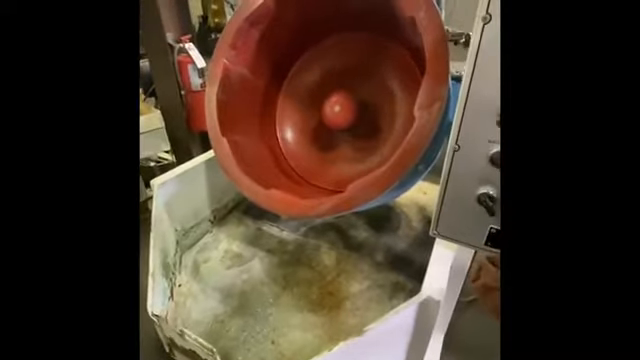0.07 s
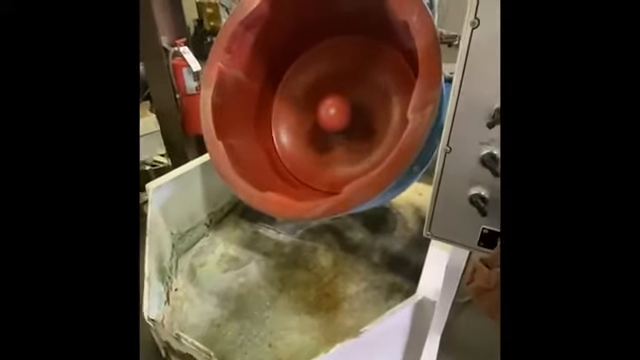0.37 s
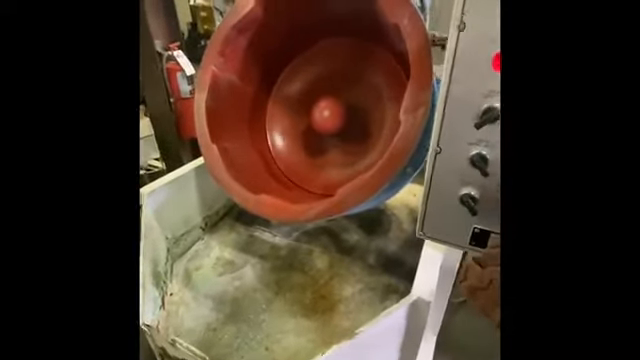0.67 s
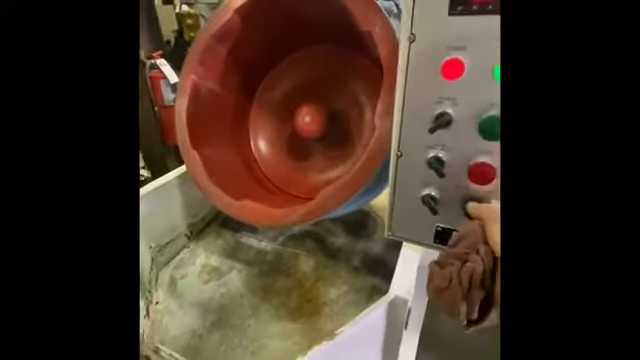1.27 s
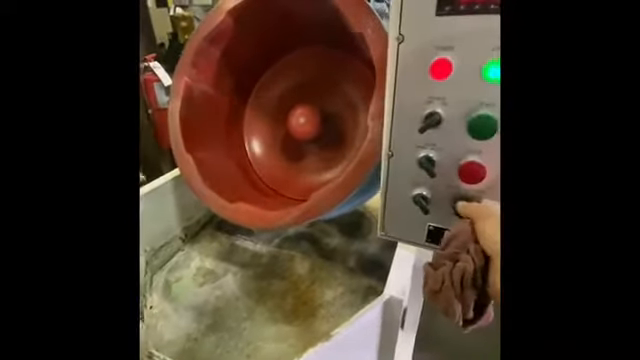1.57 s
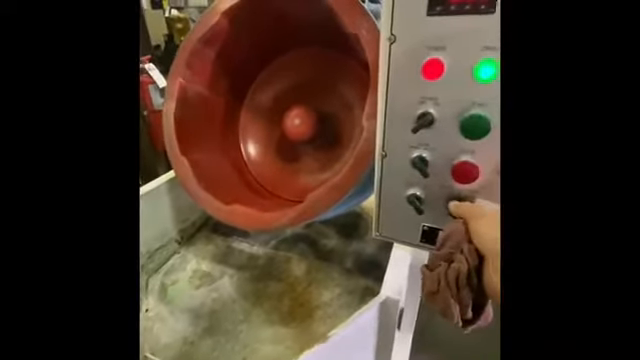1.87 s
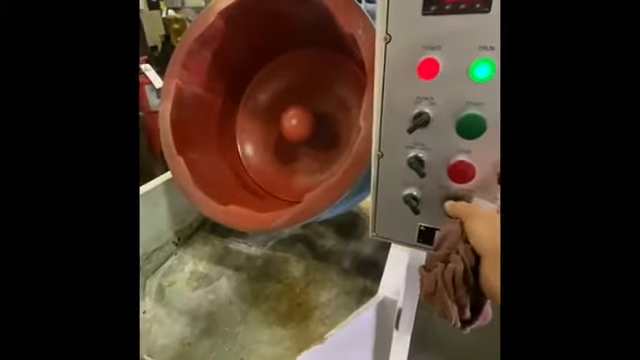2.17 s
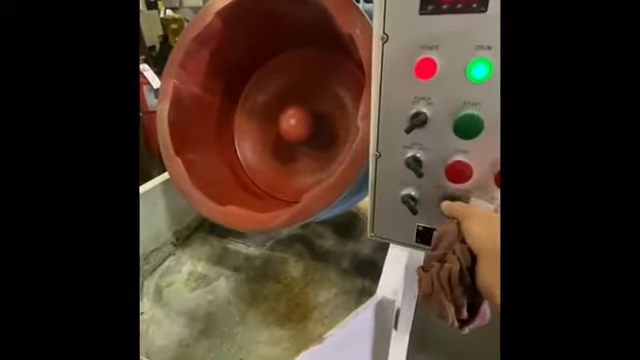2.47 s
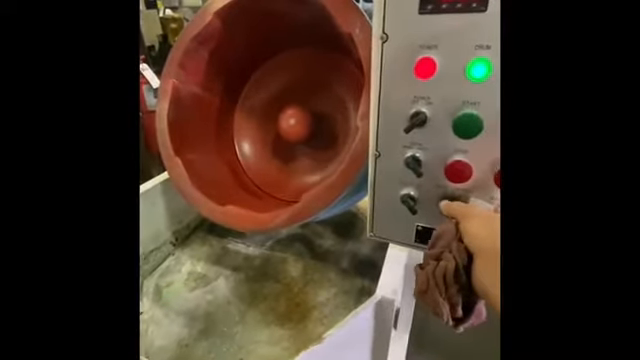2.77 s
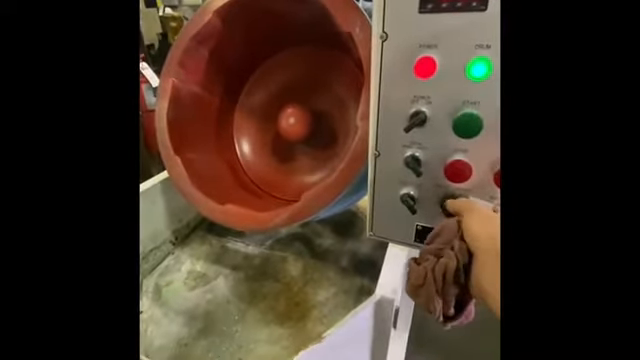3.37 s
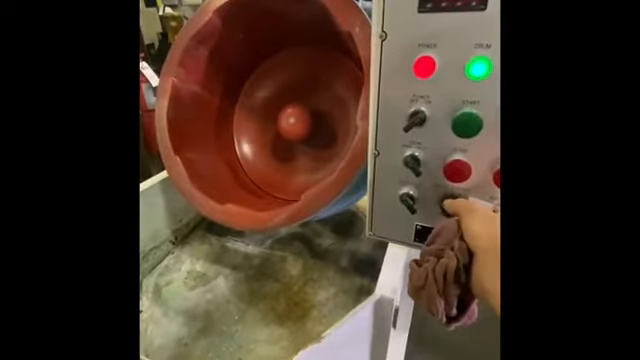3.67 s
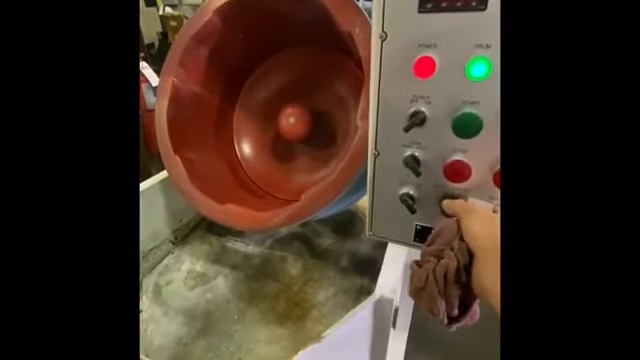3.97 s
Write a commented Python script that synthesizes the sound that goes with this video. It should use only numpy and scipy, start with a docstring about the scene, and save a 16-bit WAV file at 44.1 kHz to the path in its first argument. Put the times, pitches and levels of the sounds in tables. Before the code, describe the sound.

Low, wavering motor drone of a rotating bowl machine, with whirring air and high whining tones.

```python
"""Disc finishing machine winding down

The machine runs empty in a workshop while its inverter slowly lowers the motor speed. The turning disc
sets the tilted bowl droning in uneven swells over the rumble of the frame. The inverter's switching
tones and their sidebands whine as they drift with the speed, over whirring bearings and rushing air."""
import sys
import numpy as np
from scipy import signal
from scipy.fft import rfft, irfft
from scipy.io import wavfile

SR = 44100
rng = np.random.default_rng(int(sys.argv[2]) if len(sys.argv) > 2 else 0)


def transcribe(signal):
    """Save signal, clipped to [-1, 1], as a 16-bit WAV file at the path in sys.argv[1]."""
    frames = np.atleast_2d(signal).T
    limited = np.clip(frames, -1, 1)
    pcm = np.round(limited * 32767).astype(np.int16)
    wavfile.write(sys.argv[1], SR, pcm)


N = 176400

DRIVE_HZ, SLOWING_HZ_PER_S, SWITCHING_HZ = 54.4, 2.94, 2000
WAVER_HZ = 5.2  # pace of the slow waver in motor tones and resonances


def undb(db):
    """Decibels to gain."""
    return 10 ** (np.asarray(db) / 20)


def clock():
    """Time of every sample in seconds."""
    return np.arange(N) / SR


def curve(rows):
    """Join (t/s, value) breakpoints by straight lines."""
    return np.interp(clock(), *np.array(rows).T)


def ring(hz, width_hz):
    """A resonance shaken at random: complex narrow-band noise whose real part has rms 1."""
    detuning = (np.fft.fftfreq(N, 1 / SR) - hz) / (.78 * width_hz)
    noise = rng.standard_normal(N) + 1j * rng.standard_normal(N)
    ringing = np.fft.ifft(noise / (1 + detuning ** 2))
    return ringing / np.sqrt(np.mean(np.abs(ringing) ** 2) / 2)


def walk(rate_hz):
    """Smooth random modulation with rms 1."""
    return ring(0, rate_hz).real


def spin(hz, wander_rad, wander_hz):
    """A unit phasor that follows a pitch curve while its phase wanders smoothly."""
    return np.exp(1j * (2 * np.pi * np.cumsum(hz) / SR + wander_rad * walk(wander_hz)))


def stereo(mid, side=0, pan_db=0):
    """Mid and side to left and right; a positive pan leans left."""
    return np.array([(mid + side) * undb(pan_db / 2), (mid - side) * undb(-pan_db / 2)])


def drive_turns():
    """Cycles of the drive current so far; it slows at a constant rate."""
    t = clock()
    return DRIVE_HZ * t - SLOWING_HZ_PER_S * t ** 2 / 2


def whirr():
    """Bearings and rushing air reach the right side first, amid their own reverberation."""
    # spectrum of bearings and air: f/Hz, density/dB per Hz
    spectrum = [(22, -79), (40, -67.5), (52, -57.5), (100, -58.5), (170, -72), (300, -55.5), (460, -57.5),
                (620, -63), (800, -68.5), (1050, -69), (1700, -75), (2250, -74.5), (3100, -76.5),
                (3900, -79), (6300, -78.5), (7000, -85), (8000, -99), (9000, -89), (10200, -88.5),
                (12300, -96.5)]
    # swell of the whirr: t/s, level/dB
    swell = [(0, -0.5), (1, -1), (1.6, -0.9), (2.2, 0), (3.1, -1.15), (3.5, 1.5), (3.7, -0.6), (4, -0.5)]
    left_lag_s, room_gain, wide_from_hz = 0.501e-3, undb(7), 1000
    treble_hz, treble_rise_db_per_s = 7000, 0.7
    t, hz = clock(), np.maximum(np.fft.rfftfreq(N, 1 / SR), 1)
    source, room_mid, room_side = rfft(rng.standard_normal((3, N)))
    direct = np.array([source * np.exp(-2j * np.pi * hz * left_lag_s), source])
    room = stereo(room_mid, room_side * np.minimum(hz / wide_from_hz, 1) ** 2) / np.sqrt(2)
    points_hz, db = np.array(spectrum).T
    colour = undb(np.interp(np.log(hz), np.log(points_hz), db)) * np.sqrt(SR / 2)
    spectra = colour * (direct + room_gain * room) / np.hypot(1, room_gain)
    swell_db = curve(swell) + 0.74 * walk(rate_hz=2.8)
    out = 0
    for octave in range(4, 15):  # octave bands swell together but flicker on their own
        band = irfft(spectra * np.maximum(1 - np.abs(np.log2(hz) - octave), 0), N)
        brighten_db = treble_rise_db_per_s * (t - t.mean()) * (2 ** octave > treble_hz)
        flicker_db = 1.45 * walk(rate_hz=27)
        out = out + band * undb(swell_db + brighten_db + flicker_db)
    return out


def scuff():
    """A brief, light rub: a puff of high hiss."""
    # the rub: t/s, half-length/s, level/dB
    rubs = [(3.581, 0.012, -51)]
    envelope = sum(undb(db) * np.exp(-((clock() - at) / length) ** 2) for at, length, db in rubs)
    return ring(hz=9500, width_hz=2300).real * envelope


def rumble():
    """The running disc shakes the resonances of bowl, frame and casing, harder when it runs rough."""
    # resonances: f/Hz, width/Hz, level/dB, pan/dB, side/dB
    modes = [(50.7, 7.1, -49, -2, -22.5), (74, 15, -37.5, 0.6, -24), (124, 31, -37.5, -2, -18),
             (153.3, 10, -40.5, -2.5, -19.5), (219.8, 40, -32, -3, -20.5), (248.4, 14.4, -27, -2, -18),
             (282.7, 11.8, -27.5, -0.5, -19.5), (346.2, 15, -35, -6.5, -7), (374.3, 17, -32, -5.5, -9.5),
             (595, 14, -50.5, -4.5, 9.5), (683, 94, -52, -5.5, 8), (880.8, 13, -49, -2.5, 7.5),
             (1280, 530, -53.5, 4.5, -5.5), (1849, 32, -55.5, 1, -0.5), (2090, 73, -56.5, 1.5, -1)]
    # surges and lulls in the shaking near one pitch: t/s, half-length/s, f/Hz, level change/dB
    surges = [(0.431, 0.036, 380, 10), (2.33, 0.06, 376, 8), (2.704, 0.043, 402, 8),
              (3.3, 0.045, 385, 13.5), (3.545, 0.16, 390, 5.5), (0.11, .06, 73, 7), (3.45, 0.079, 75, 12),
              (3.43, .2, 140, 7), (1.85, .3, 365, -4), (0.34, .4, 883, 3.5), (2.3, .4, 883, -5),
              (3.7, .3, 883, -4.5), (2.3, .8, 2500, 0), (.2, .6, 2150, -1), (0.32, 0.22, 250, 7),
              (1.2, 0.24, 588, 5)]
    spread_octaves, waver_db = 0.15, 1
    t, out = clock(), 0
    for hz, width_hz, db, pan_db, side_db in modes:
        level_db = db + waver_db * walk(WAVER_HZ)
        for at, length, centre_hz, change_db in surges:
            detuning = np.log2(hz / centre_hz) / spread_octaves
            level_db += change_db * np.exp(-((t - at) / length) ** 2 - detuning ** 2)
        mid = ring(hz, width_hz).real
        side = undb(side_db) * ring(hz, width_hz).real
        out = out + undb(level_db) * stereo(mid, side, pan_db)
    return out


def frame_hum():
    """The frame throbs about an octave below the bowl, sinking slightly as the motor slows."""
    # throb of the frame: t/s, relative level/dB
    throb = [(0.0, -43), (0.08, -30), (0.28, -38.5), (0.76, -29), (0.78, -41), (0.89, -31.5), (1.25, -30),
             (1.31, -46), (1.39, -32.5), (1.67, -37.5), (1.73, -26), (1.79, -34.5), (1.95, -28.5),
             (2.0, -41), (2.37, -27.5), (2.91, -38), (3.2, -34.5), (3.54, -25), (3.6, -33.5), (3.85, -27.5),
             (3.94, -45), (4.0, -26)]
    start_hz, sink_hz_per_s, gain_db = 132.5, 2.5, 2.5
    mode = spin(start_hz - sink_hz_per_s * clock(), wander_rad=0.97, wander_hz=4)
    return stereo(mode.real * undb(curve(throb) + gain_db), pan_db=-1.5)


def rotor_tone():
    """A low, clean tone sinks with the speed and sings out as it meets a resonance of the frame."""
    # swell of the rotor tone: t/s, level/dB
    swell = [(0, -59), (.8, -51), (1.2, -43), (1.9, -43), (2.3, -48), (2.75, -44), (3, -37), (3.42, -39),
             (3.55, -28), (3.78, -26), (3.88, -35), (4, -36.5)]
    drive_multiple, waver_db = 10.33, 0.5
    tone = np.cos(2 * np.pi * (drive_multiple * drive_turns() + rng.random()))
    return stereo(tone * undb(curve(swell) + waver_db * walk(WAVER_HZ)), pan_db=-10)


def motor_tone(carrier, order, level_db, waver_db, side_db):
    """One sideband of the switching rate follows the drive frequency, roughened by the shaking casing."""
    jitter_rad, rough_db = 0.18, -14.5
    phase = 2 * np.pi * (carrier * SWITCHING_HZ * clock() + order * drive_turns() + rng.random())
    waver = ring(0, WAVER_HZ)
    roughness = 1 + undb(rough_db) * ring(0, width_hz=38)
    envelope = undb(level_db + waver_db * waver.real)
    tone = roughness * envelope * np.exp(1j * (phase + jitter_rad * waver.imag))
    return stereo(tone.real, undb(side_db) * tone.imag) / np.hypot(1, undb(side_db))


def inverter_whine():
    """Switching tones each swell once, loudest as they slide through a resonance of the casing."""
    # tones: switching multiple, drive multiple, relative level/dB, peak t/s, half-width/s, side/dB
    tones = [ (1, -3, -49, 1.9, 1.1, -3), (1, -1, -58.5, .9, 2.6, -7), (1, 1, -45.5, 2.57, 0.8, -12.5),
             (1, 2, -51.5, 2.9, 0.5, -0.5), (1, 3, -41.5, 2.32, 0.99, 2.5), (1, 5, -48.5, 2.35, 0.18, -1.5),
             (2, -6, -52, 2.9, 1.2, -1), (2, -2, -62, 1.3, 2.6, 0.5), (2, 0, -52.5, 3.6, 1.7, -16),
             (2, 2, -49.5, 3, 0.98, -3), (2, 4, -57.5, 1.4, 2.2, -2.5), (3, -9, -52.5, 0.073, 2.1, -13.5),
             (3, -5, -54, .1, 3.7, -6), (3, -3, -53.5, 3.5, 1.8, -8.5), (3, -1, -61.5, 3.9, 0.67, -2),
             (3, 1, -60, .1, 2.2, -1.5), (3, 3, -58, 3.6, .4, -1.5), (3, 5, -51, 3.8, 1.1, -10.5),
             (3, 7, -52, 1.5, 5.3, 4.5), (3, 11, -56, 1.2, 0.68, 4), (4, -2, -55.5, 3.3, 0.31, 2)]
    gain_db = 2
    t, out = clock(), 0
    for carrier, order, db, at, width, side_db in tones:
        swell_db = -10 * np.log10(1 + ((t - at) / width) ** 2)
        out = out + motor_tone(carrier, order, db + gain_db + swell_db, waver_db=2, side_db=side_db)
    return out


def whistles():
    """Two strong high sidebands flare again and again as they cross narrow resonances of the casing."""
    # flares of the lower and the upper whistle: t/s, level/dB
    lower = [(0, -49), (.3, -48), (.65, -42), (.95, -42.5), (1.17, -42), (1.45, -48), (1.62, -49),
             (1.8, -49), (2.5, -54.5), (2.68, -47), (2.85, -52), (3.15, -47), (3.35, -60), (4, -66)]
    upper = [(0, -46), (.28, -48), (.42, -41), (.6, -52), (.78, -44), (1.05, -47), (1.13, -50),
             (1.25, -52.5), (1.43, -55.5), (1.57, -46), (1.85, -54), (2.3, -56.5), (2.6, -61), (4, -70)]
    return sum(motor_tone(2, order, curve(flares), waver_db=0, side_db=-10.5)
               for order, flares in ((6, lower), (20.34, upper)))


def bowl_drone():
    """The bowl's main mode swells, dips and bends; weaker neighbours on either side beat against it."""
    # swells of the bowl: t/s, relative level/dB
    swells = [(0.0, -21.5), (0.05, -32), (.1, -23), (0.12, -10.5), (.14, -18.5), (.2, -14.5), (.22, -25),
              (.28, -19.5), (.31, -13), (.37, -26.5), (.4, -11), (0.5, -19.5), (0.54, -25.5), (0.62, -12),
              (0.71, -26), (0.87, -12.5), (1.01, -12), (1.04, -21.5), (1.07, -11.5), (1.16, -9),
              (1.28, -9.5), (1.38, -13.5), (1.41, -28), (1.43, -14), (1.56, -20), (1.58, -9), (1.65, -21.5),
              (1.7, -9), (1.76, -17), (1.84, -16.5), (1.87, -23), (2.25, -16), (2.32, -7.5), (2.36, -18),
              (2.46, -17), (2.48, -25.5), (2.53, -8), (2.57, -10), (2.64, -29.5), (2.74, -12), (2.82, -28),
              (2.94, -15), (3.1, -31.5), (3.27, -8.5), (3.55, -25), (3.6, -16.5), (3.62, -39), (3.7, -16),
              (3.74, -43), (3.9, -13.5), (3.92, -30), (4.0, -15.5)]
    # pitch of the bowl: t/s, f/Hz
    pitch = [(0, 265.6), (0.3, 267.0), (0.62, 270.6), (0.9, 266.2), (1.2, 268.2), (1.45, 265.2),
             (1.72, 265.9), (2.02, 264.3), (2.3, 272.9), (2.55, 271.7), (2.75, 268.7), (3.0, 265.0),
             (3.3, 264.5), (3.55, 267.8), (3.9, 266.5)]
    gain_db, beat_hz, beat_width_hz = 2, 15.5, 1.8
    mode = spin(curve(pitch), wander_rad=0.63, wander_hz=2.9)
    neighbours = (ring(beat_hz, beat_width_hz) + ring(-beat_hz, beat_width_hz)) / 2
    beating = mode * (1 + undb(-15) * neighbours)
    return stereo(beating.real * undb(curve(swells) + gain_db), pan_db=-2.5)


def scene():
    """The whole machine from arm's length."""
    bed = whirr() + scuff() + rumble() + frame_hum()
    motor = rotor_tone() + inverter_whine() + whistles()
    return bed + motor + bowl_drone()


def record(dry):
    """Roll off the deepest bass and cut the top steeply."""
    low_cut = signal.butter(4, 41, "high", fs=SR, output="sos")
    high_cut = signal.ellip(8, .2, 70, 12400, fs=SR, output="sos")
    return signal.sosfilt(high_cut, signal.sosfilt(low_cut, dry))


dry = scene()
out = record(dry)
transcribe(out)
```